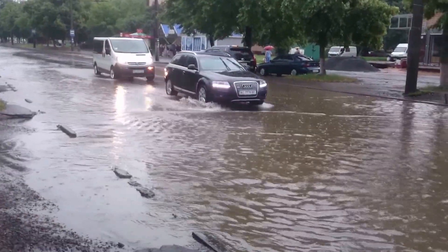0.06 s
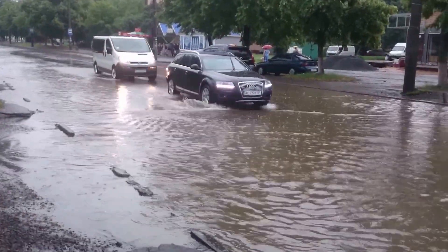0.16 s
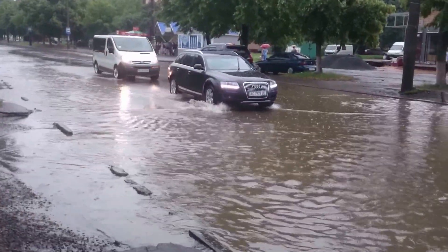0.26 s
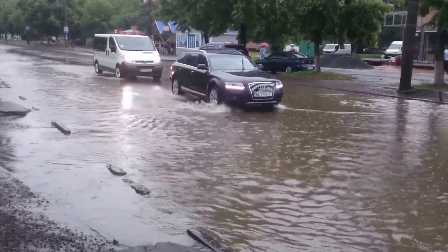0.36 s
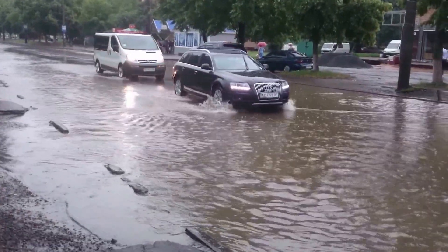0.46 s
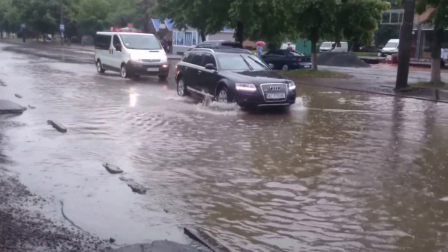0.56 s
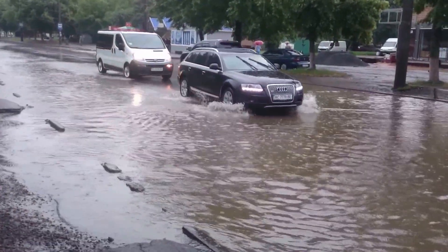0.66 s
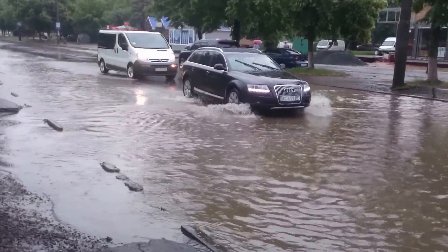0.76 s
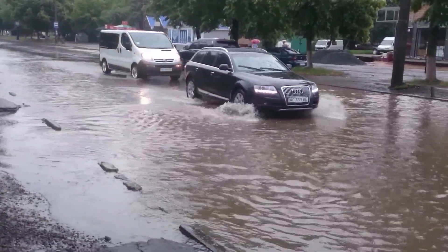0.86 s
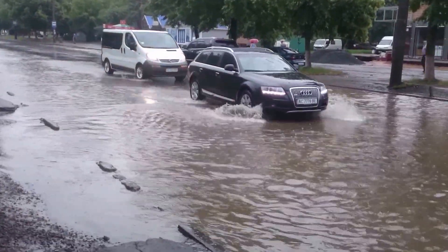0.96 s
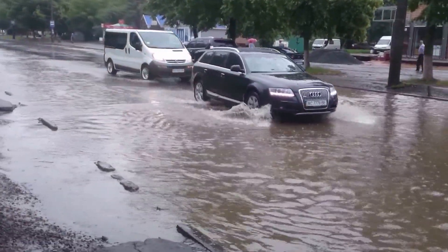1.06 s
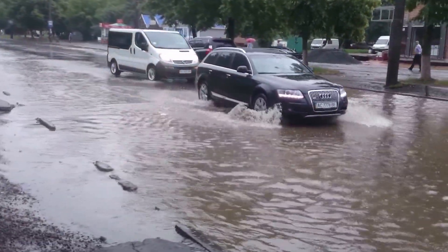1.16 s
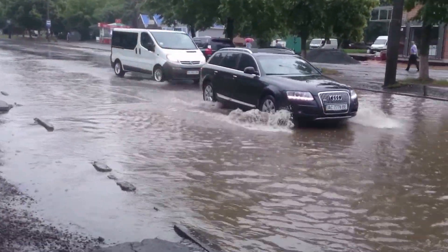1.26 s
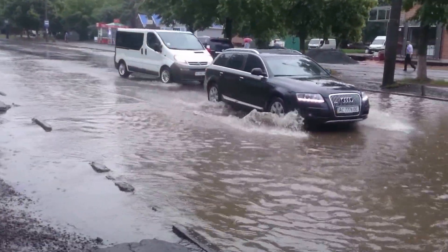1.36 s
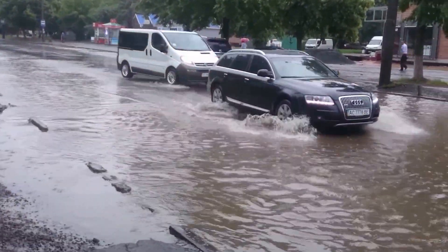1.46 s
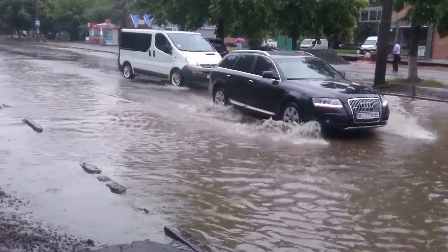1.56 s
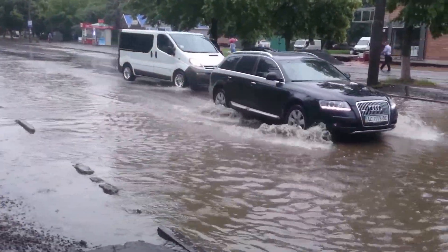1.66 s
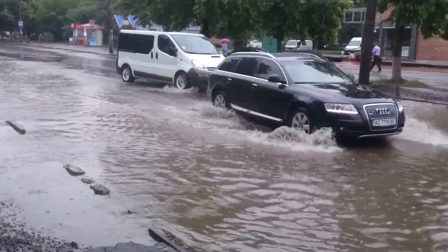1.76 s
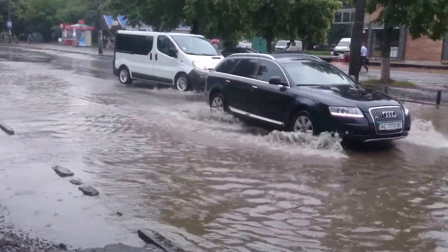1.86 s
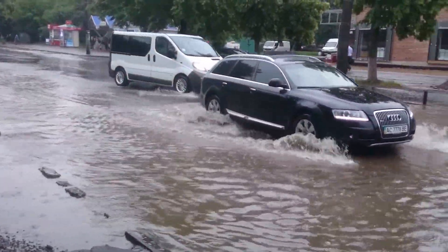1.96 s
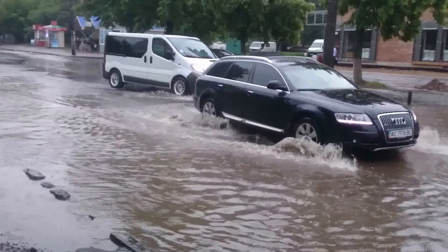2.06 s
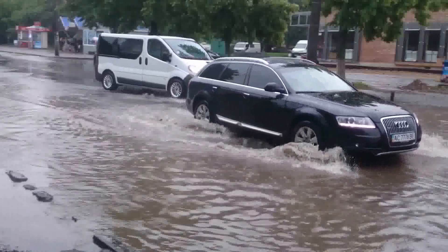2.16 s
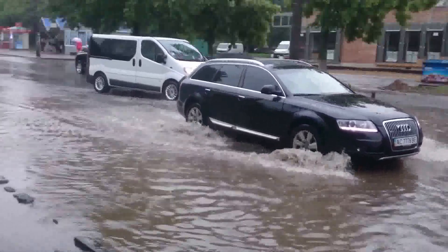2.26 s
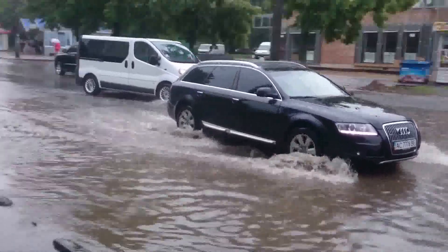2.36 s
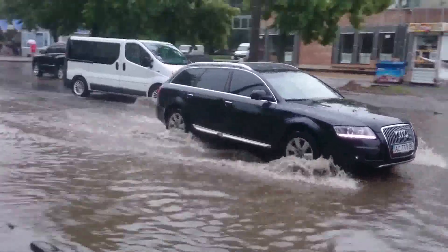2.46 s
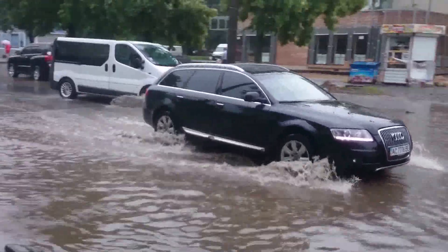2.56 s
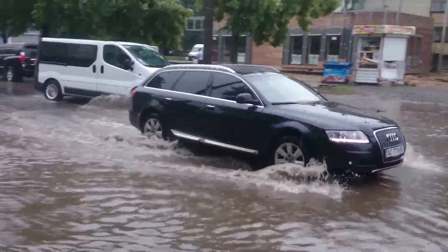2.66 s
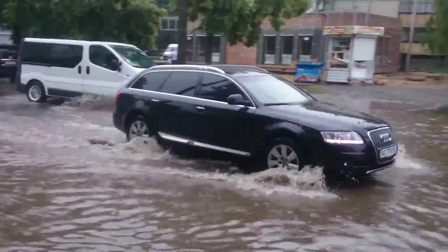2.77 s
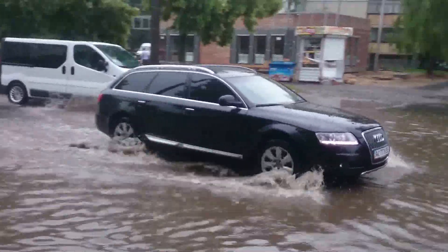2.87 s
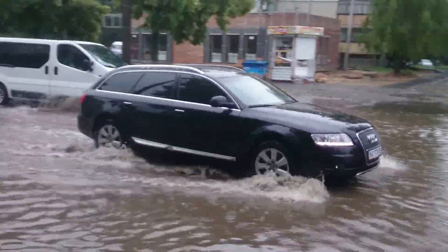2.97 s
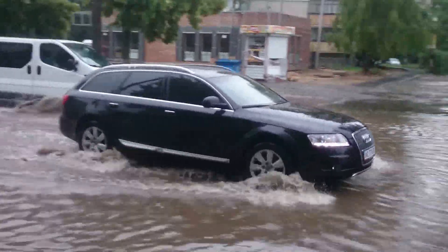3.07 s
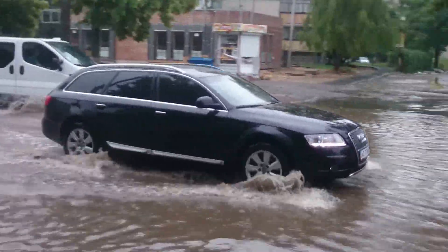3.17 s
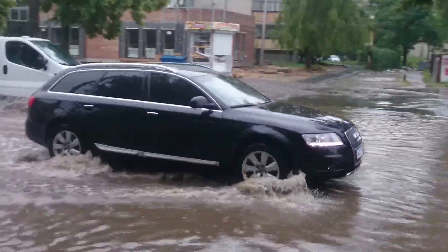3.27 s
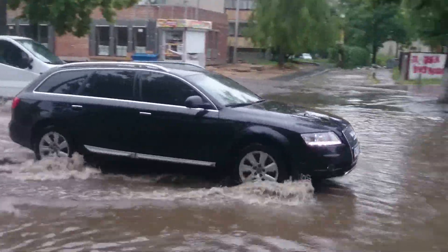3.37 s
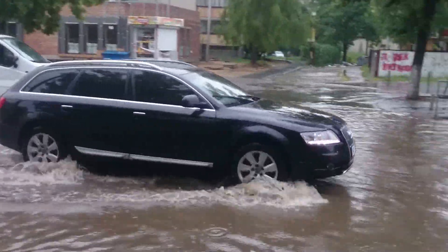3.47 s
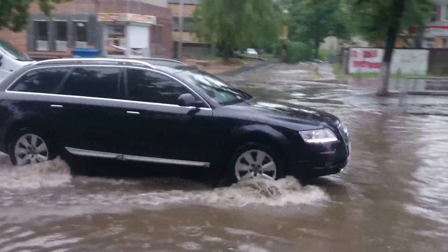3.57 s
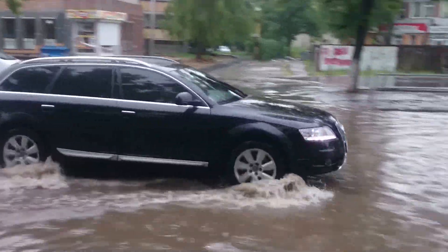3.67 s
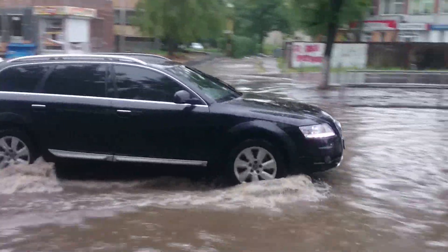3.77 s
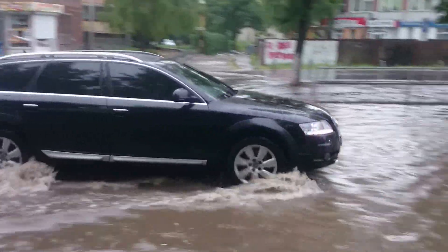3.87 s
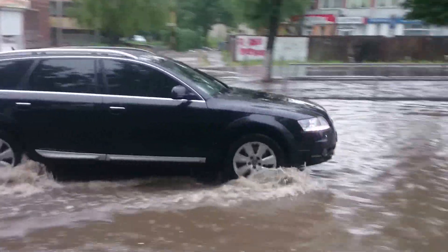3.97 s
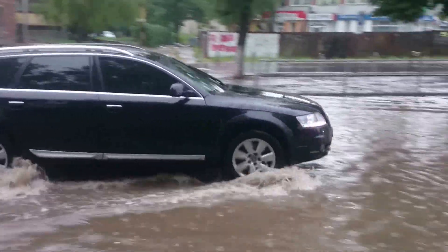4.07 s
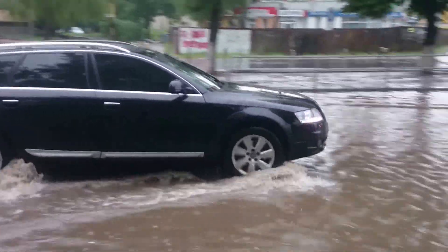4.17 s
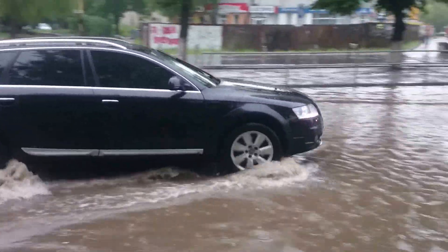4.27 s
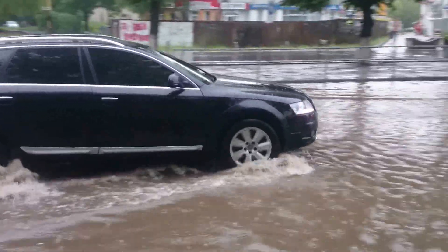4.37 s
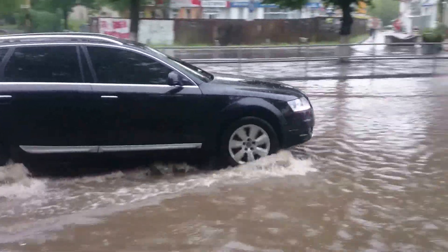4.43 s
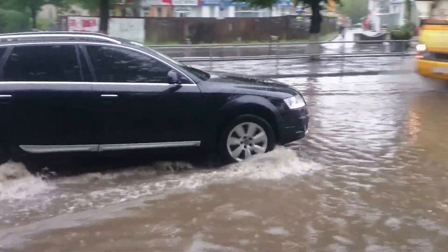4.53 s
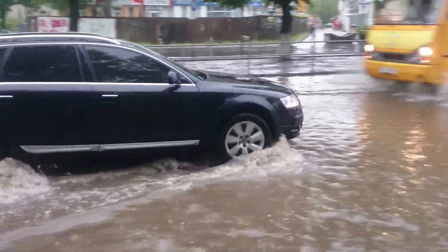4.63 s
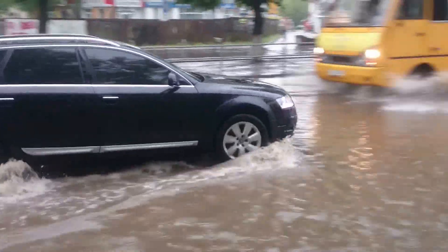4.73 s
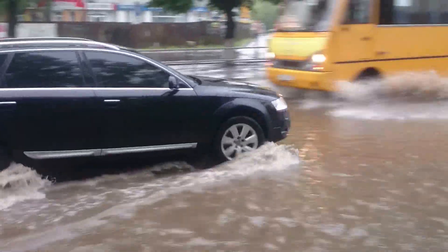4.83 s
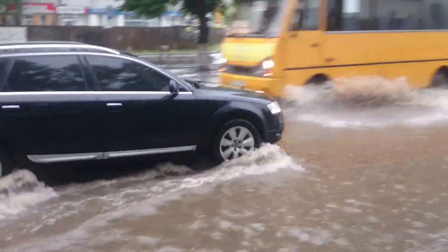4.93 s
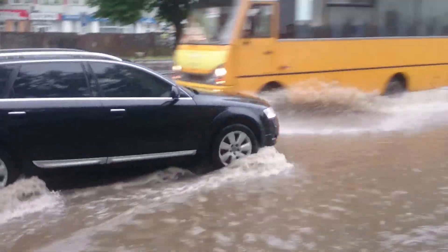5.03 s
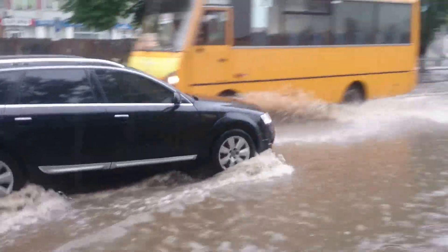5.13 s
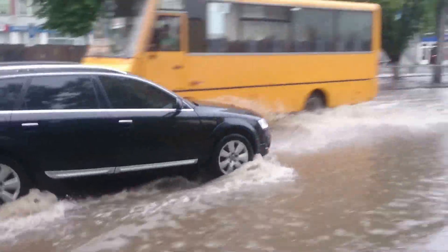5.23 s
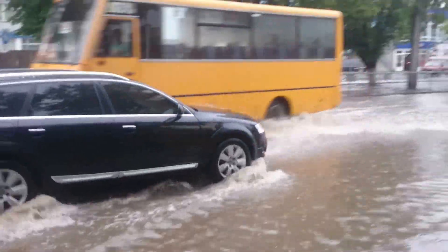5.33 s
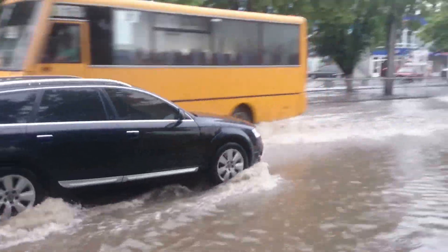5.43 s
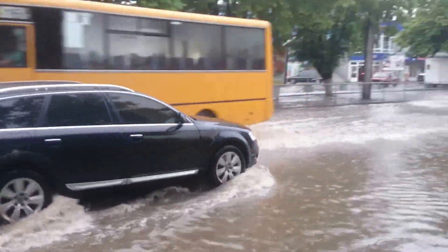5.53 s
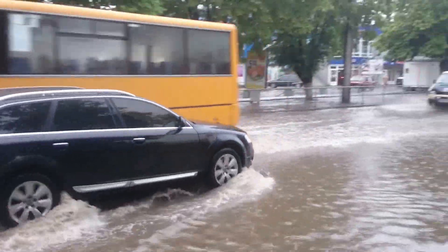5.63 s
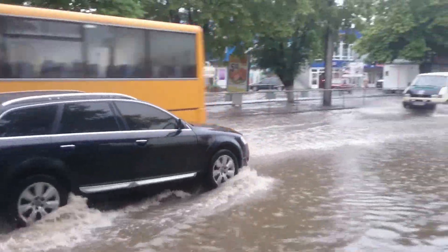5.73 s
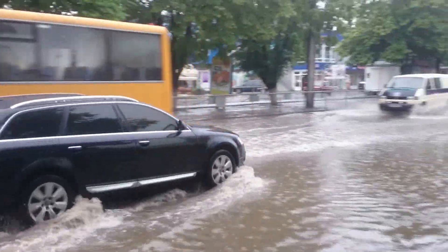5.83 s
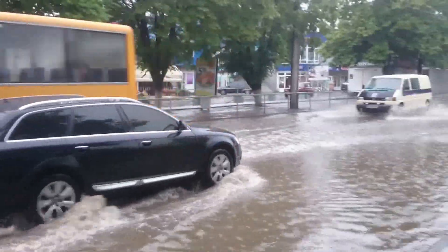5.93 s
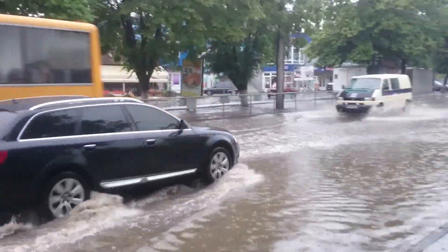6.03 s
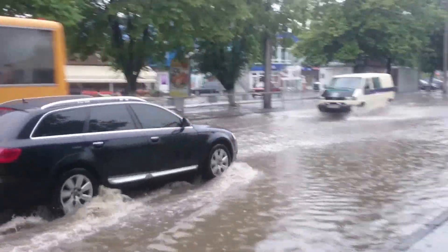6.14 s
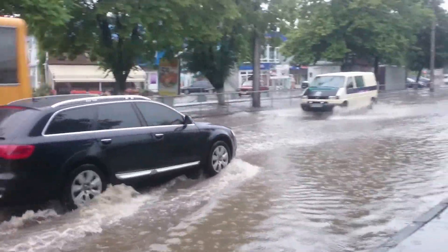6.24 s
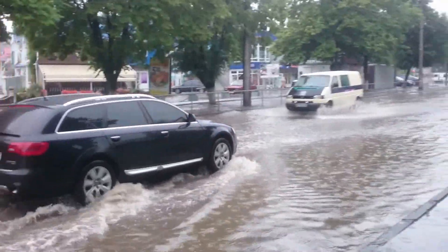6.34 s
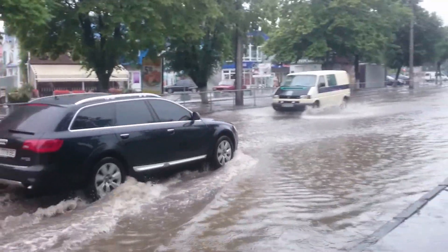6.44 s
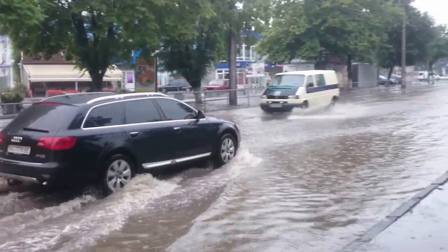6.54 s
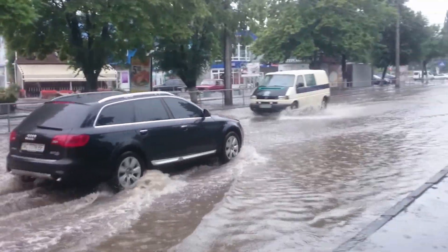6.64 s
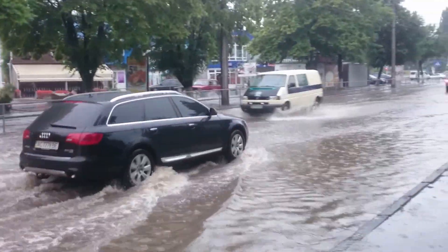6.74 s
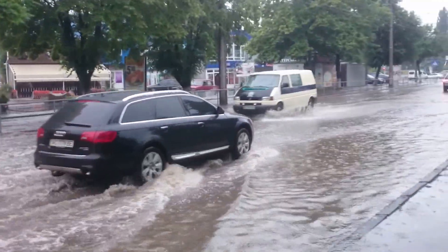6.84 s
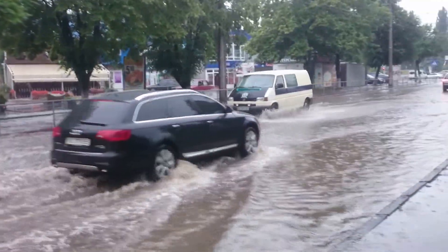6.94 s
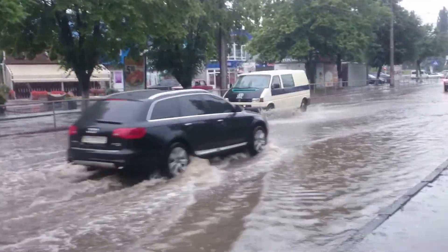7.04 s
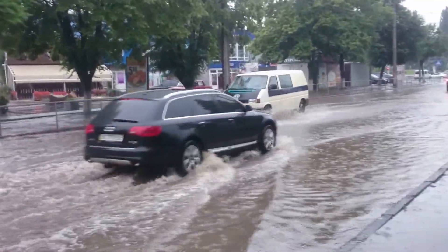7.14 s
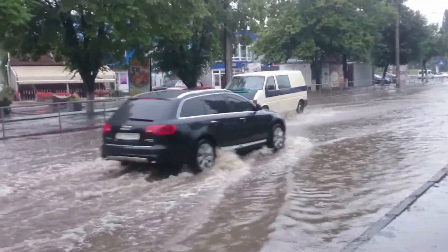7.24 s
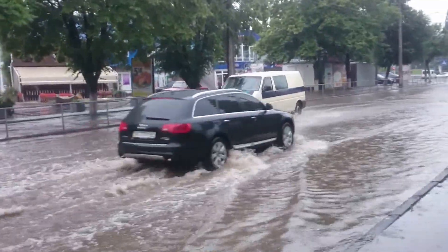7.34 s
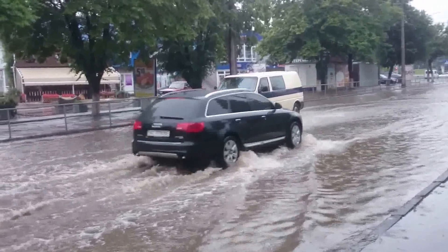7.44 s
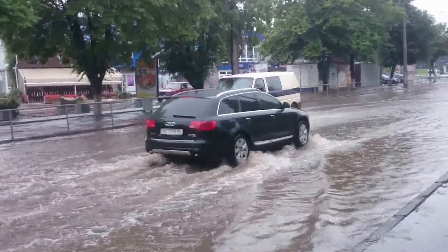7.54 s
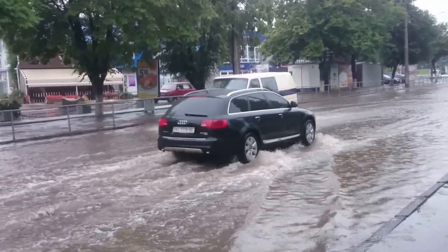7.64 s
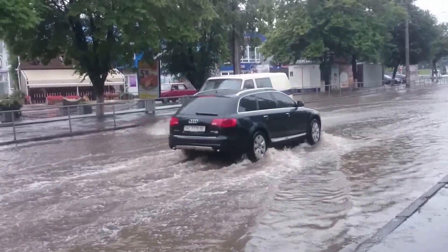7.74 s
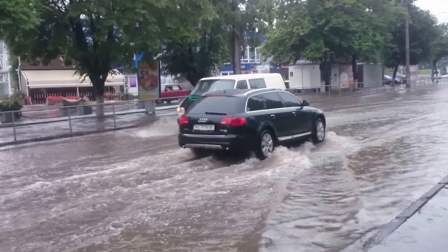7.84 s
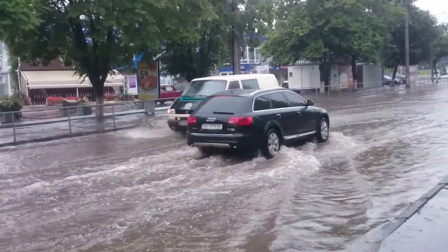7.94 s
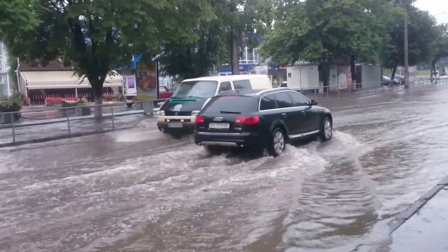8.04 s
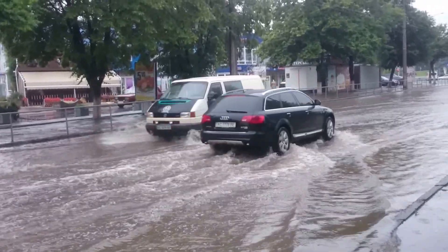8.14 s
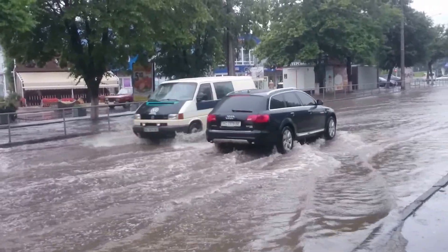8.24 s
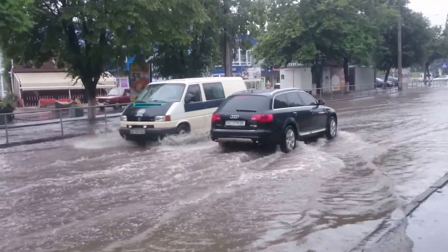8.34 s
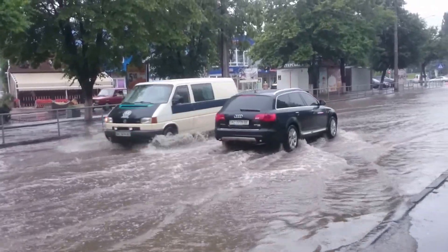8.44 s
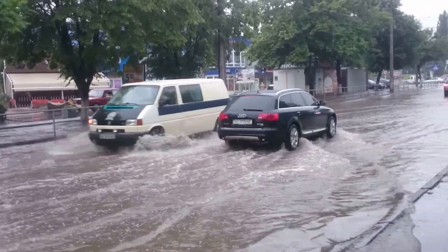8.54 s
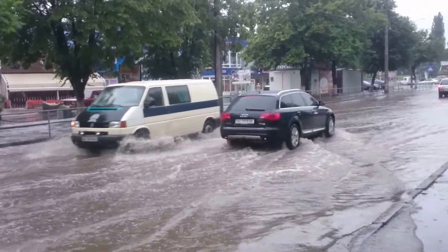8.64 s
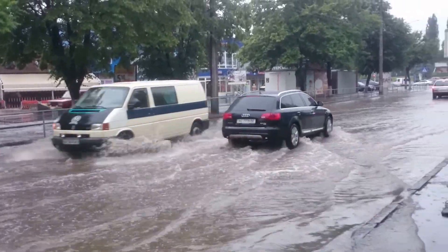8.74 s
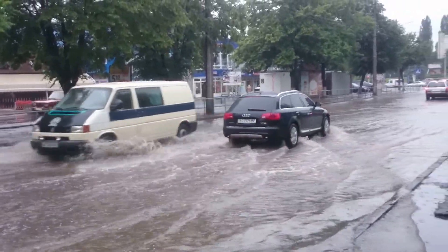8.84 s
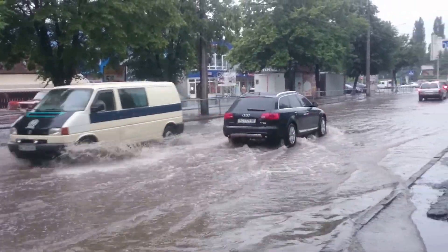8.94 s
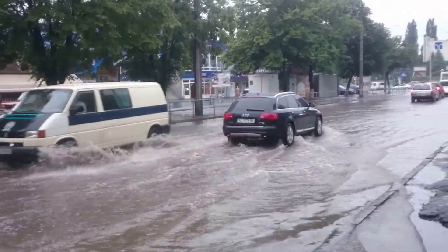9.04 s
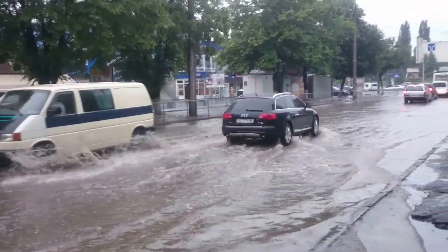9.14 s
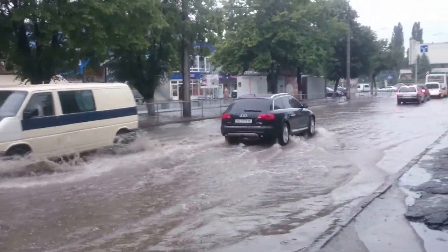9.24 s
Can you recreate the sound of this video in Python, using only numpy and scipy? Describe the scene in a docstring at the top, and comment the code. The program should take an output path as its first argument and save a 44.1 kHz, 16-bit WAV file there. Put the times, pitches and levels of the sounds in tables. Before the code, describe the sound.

A car wades slowly past through deep water, its wheels hissing and splashing over a low engine hum and rumble.

```python
"""A car wades slowly through a flooded street, passing close to a handheld phone.
Its wheels throw hissing spray over splashing, churning water; body and exhaust rumble, and the six-cylinder
engine hums with a faint whine. Farther off, bus and van traffic is a deep throb. Waves thump the bodywork,
the hand trembles, one raindrop hits the phone. The two microphones sit at opposite ends of the phone,
each behind a port with its own resonance."""
import sys
import numpy as np
from scipy import signal
from scipy.fft import rfft, irfft, next_fast_len
from scipy.io import wavfile
from scipy.ndimage import uniform_filter1d, map_coordinates

SR = 44100
rng = np.random.default_rng(int(sys.argv[2]) if len(sys.argv) > 2 else 0)


def to_wav(s):
    """Save 16-bit WAV."""
    ch = np.atleast_2d(s).T  # columns
    pcm = np.round(np.clip(ch, -1, 1) * 32767)  # PCM
    wavfile.write(sys.argv[1], SR, pcm.astype(np.int16))


N = 410130
TIME = np.arange(N) / SR


def gain_of(db):
    """Decibels to gain."""
    return 10 ** (np.asarray(db) / 20)


def unit_rms(x):
    """Scales to rms 1."""
    return x / np.sqrt(np.mean(x ** 2) + 1e-20)


def spectrum_at(points, hz):
    """Reads a spectrum on a log-frequency axis."""
    f, value = np.transpose(points)
    return np.interp(np.log(hz + 1), np.log(f + 1), value)


def follow(rows, t=TIME):
    """Reads every column of a curve at the times t."""
    times, *columns = np.transpose(rows)
    return [np.interp(t, times, column) for column in columns]


def wander(top_hz):
    """Random drift of rms 1, no faster than top_hz."""
    rates = np.geomspace(top_hz / 20, top_hz, num=24)
    return unit_rms(sum(np.sin(2 * np.pi * (f * TIME + rng.random())) / np.sqrt(f) for f in rates))


def panned(db):
    """Splits a left-minus-right level between the microphones."""
    return gain_of(np.array([db, -db]) / 2)


def tones(hz, orders=((1, 0),), *, waver_db):
    """Sines at (multiple, level [dB]) of a frequency curve, each wavering in level."""
    turns = np.cumsum(hz) / SR
    return np.sqrt(2) * sum(
        gain_of(db + waver_db * wander(5.1)) * np.sin(2 * np.pi * (k * turns + rng.random()))
        for k, db in orders)


# Direction from the phone: (time [s], left lag of the low sounds [ms], left lag of spray and splash [ms],
# share arriving from that side [0-1], spray left minus right [dB])
BEARING = [(0, 0.05, 0.33, 0.4, -1.5), (1.3, 0.05, .33, 0.5, -0.5), (1.8, -0.015, 0.3, 0.5, 0),
           (2.4, -0.036, 0.32, .55, 0), (3.7, -0.13, 0.38, .3, -.5), (4.2, -.15, 0.34, 0.4, 1.7),
           (4.8, 0.08, 0.3, 0.4, 1), (5.3, -0.23, -0.017, 0.4, 0), (5.8, -0.32, -0.38, 0.57, -1),
           (6.5, -0.36, -0.45, 0.9, -2), (7.8, -.35, -0.43, .9, -6), (8.7, -0.31, -0.36, .4, -2),
           (9.3, -.22, -0.32, 0.81, -1)]
# Likeness of the two ports for sound from one side: (frequency [Hz], coherence [0-1])
DIRECT_COHERENCE = [(250, 0.98), (1000, 0.85), (1500, 0.64), (2300, 0.69), (3200, 0.27), (5000, 0.2),
                    (8000, 0.14)]
# The same for sound from all around, negative where they move in opposition: (frequency [Hz], coherence)
DIFFUSE_COHERENCE = [(60, .99), (250, 0.88), (600, .55), (1050, -0.044), (1200, -0.24), (1380, -0.81),
                     (1560, -0.15), (2000, -0.064), (2600, 0.12), (3500, 0.014)]
def port_coherence(hz, t, from_wheels):
    """The direct share reaches the left port late or early; the rest arrives from all around."""
    low_ms, spray_ms, share, _ = follow(BEARING, t)
    lag_s = (spray_ms if from_wheels else low_ms) / 1000
    direct = np.clip(spectrum_at(DIRECT_COHERENCE, hz) * share, 0, 1)
    diffuse = np.clip(spectrum_at(DIFFUSE_COHERENCE, hz), -1, 1)
    return direct * np.exp(-2j * np.pi * hz * lag_s) + (1 - direct) * diffuse


# Right port's ring, shifting with the angle of the sound:
# (time [s], height [dB], centre [Hz], half-width [Hz])
PORT_RING = [(0, 3, 5650, 220), (.95, 2, 5650, 220), (1.1, 5, 5700, 220), (2.2, 2.5, 5700, 250.1),
             (3, 5.5, 5750, 300), (4.5, 3, 5800, 350), (5.5, 5, 5930, 400), (6.8, 7, 6050, 450),
             (7.3, 5, 5850, 350.2), (7.8, 3.5, 5600, 300), (9.3, 3.5, 5500, 300)]
def wash(colour, size, patchy_db, flicker_db, from_wheels=False, pitch=0.89, tilt=0., ring=False):
    """Patchy, flickering noise at both ports; pitch scales the colour's frequencies, tilt is dB/octave."""
    hop = size // 4
    frames, hz = N // hop + 5, np.fft.rfftfreq(size, 1 / SR)[:, None]
    t = np.arange(frames) * hop / SR
    real, imag, own_real, own_imag, patches = rng.standard_normal((frames, len(hz), 5)).T
    patches = uniform_filter1d(patches, size=size // 64, axis=0)
    patches = unit_rms(uniform_filter1d(patches, size=4096 // hop, axis=1))
    flicker = unit_rms(uniform_filter1d(rng.standard_normal(frames), size=max(2048 // hop, 1)))
    coherence = port_coherence(hz, t, from_wheels)
    right = real + 1j * imag
    left = coherence * right + np.sqrt(np.maximum(1 - abs(coherence) ** 2, 0)) * (own_real + 1j * own_imag)
    pitch, tilt = (np.interp(t, TIME, v * np.ones(N)) for v in (pitch, tilt))
    db = spectrum_at(colour, hz / pitch) + tilt * np.log2(hz / 5500 + 0.015)
    treble_flicker_db = 0.05 * np.log2(np.maximum(hz / 5700, 1))  # grows above the port resonance
    db += patchy_db * patches + (flicker_db + treble_flicker_db) * flicker
    if ring:
        ring_db, ring_hz, width_hz = follow(PORT_RING, t)
        right = right * gain_of(ring_db / (1 + ((hz - ring_hz) / width_hz) ** 2))
    _, noise = signal.istft(np.array([left, right]) * gain_of(db), nperseg=size, noverlap=size - hop)
    return unit_rms(noise[:, :N])


# Spectrum of the traffic behind the car: (frequency before pitch scaling [Hz], level [dB])
THROB_COLOUR = [(1.5, -26), (4, -9), (11, -7), (17, -2), (25, -3), (33, -9), (50, -12), (100, -38)]
# Its swells: (time [s], level [dB])
THROB_LEVEL = [(0, -34.5), (.6, -32), (1.3, -28.5), (1.8, -33), (2.1, -28), (2.5, -33), (2.7, -32),
               (3.3, -29), (4, -30), (5, -27), (5.8, -28.5), (6.5, -25), (7.2, -26.5), (7.8, -27.5),
               (8.5, -31), (9.3, -27.5)]
def traffic_throb():
    """Traffic farther down the street arrives as deep noise, in lumps."""
    level_db = follow(THROB_LEVEL)[0] + 2.5 * wander(7.)
    return gain_of(level_db) * wash(THROB_COLOUR, 16384, patchy_db=0.69, flicker_db=0.99)


# Shake of the hand holding the phone: (time [s], level [dB])
TREMOR_LEVEL = [(0, -35), (1, -33), (1.35, -26), (1.7, -30), (2.8, -30), (3.2, -22), (3.9, -29), (4.6, -28),
                (5, -22), (5.55, -30), (5.85, -24), (6.3, -29), (6.8, -22), (7.6, -28), (7.95, -22),
                (8.8, -28), (9.3, -23)]
def hand_tremor():
    """The trembling hand pumps both microphones far below hearing."""
    hz = 8.7 + .35 * wander(2.)
    return gain_of(follow(TREMOR_LEVEL)[0]) * tones(hz, waver_db=1.)


# One drop on the phone itself: (time [s], tick level [dB], push level [dB])
RAINDROP = (2.42, -25, -16)
def raindrop():
    """A drop lands at the right port: a bright tick and a low push, much weaker on the left."""
    hit_s, tick_db, push_db = RAINDROP
    gap_s = abs(TIME - hit_s)
    crack = rng.standard_normal(N) * np.exp(-gap_s / .0004)
    tick = 3 * crack + .7 * np.diff(crack, 2, prepend=[0, 0])  # the hard shell adds treble
    push = -np.exp(-gap_s / 0.0025)
    return (gain_of(tick_db) * tick + gain_of(push_db) * push) * gain_of([[-14], [.1]])


# Waves striking the car: (time [s], level [dB], pitch [Hz])
THUMPS = [(0.101, -26, 89.6), (0.587, -21, 81), (1.41, -25, 40), (1.955, -22, 38), (2.59, -28, 40),
          (8.034, -30, 152.7), (8.201, -18, 164)]
def wave_thumps():
    """Each wave gives the bodywork a short, damped low ring."""
    out = np.zeros(N)
    for hit_s, db, hz in THUMPS:
        age = np.maximum(TIME - hit_s, 0)
        out -= gain_of(db) * np.sin(2 * np.pi * hz * age) * np.exp(-age / 0.018)
    return out


# Spectrum of body and exhaust: (frequency before pitch scaling [Hz], level [dB])
RUMBLE_COLOUR = [(10, -4), (30, 9), (60, -0.5), (110, 2.5), (200, 1), (300, -1.5), (420, -8.5), (800, -27)]
# Their course past the phone: (time [s], level [dB], pitch [factor])
RUMBLE = [(0, -42, 0.77), (.45, -42, 1.06), (1.1, -38, 1), (1.7, -39, 0.93), (2.7, -37.5, 1.07),
          (2.9, -35.5, 1.37), (3.3, -32.5, 1.4), (3.7, -32, 1.29), (4.2, -32, 1.034), (4.9, -29, 0.72),
          (5.3, -32, 0.82), (5.7, -32.5, 0.8), (6.3, -26.5, 0.98), (7.4, -28.5, 1.26), (8.3, -31, 1.18),
          (8.45, -32, 0.97), (8.8, -34, 1.11), (9.3, -29.5, 0.72)]
def body_rumble():
    """Body and exhaust give a low noise that shifts in pitch as the car goes by."""
    level_db, pitch = follow(RUMBLE)
    return gain_of(level_db) * wash(RUMBLE_COLOUR, 4096, patchy_db=0.68, flicker_db=0.3, pitch=pitch)


# Whine on the approach: (time [s], pitch [Hz], level [dB])
WHINE = [(0, 404, -54), (1.5, 404, -52), (1.9, 404, -57), (2.6, 404.5, -55), (2.7, 420, -62),
         (2.8, 449, -49), (3.2, 450, -47.5), (3.35, 451, -44), (3.62, 452, -41.5), (3.8, 450, -65),
         (4.1, 456, -90)]
def whine():
    """A faint, slightly rough tone while the car draws near."""
    hz, level_db = follow(WHINE)
    return gain_of(level_db) * tones(hz + 2.5 * wander(40.), waver_db=1.5)


# Cylinders firing: (time [s], firing rate [Hz], firing tone [dB], its octave [dB])
FIRING = [(0, 80.2, -50.5, -47), (.6, 79.33, -36.5, -47.5), (1.4, 79, -48, -45), (1.9, 75.2, -43.5, -48),
          (2.7, 72.1, -44, -50), (2.95, 72.2, -41, -37), (3.07, 71.8, -39, -44), (3.17, 71.8, -37, -38),
          (3.27, 71.5, -38, -46), (3.37, 71.6, -38, -35), (3.55, 71.5, -33.5, -44), (3.8, 72.5, -40, -34.5),
          (4.2, 73.84, -34.5, -33.5), (4.75, 75.46, -35, -55), (4.98, 75.8, -35, -42),
          (5.07, 75.5, -31.5, -29.5), (5.35, 76, -30, -34), (5.6, 76.5, -30, -28),
          (5.85, 76.74, -27, -34.5), (6.05, 77.2, -34, -28), (6.25, 77.64, -34, -37.5),
          (6.38, 77.6, -33, -30), (6.6, 77.8, -36, -35), (6.9, 78.05, -34, -34.5), (7.3, 77.75, -32, -27.5),
          (7.8, 78.24, -39.5, -34.5), (8.25, 77.34, -34, -34), (8.7, 78, -35, -42.5),
          (9.3, 77.6, -37.5, -40)]
# Higher harmonics of the firing: (time [s], third [dB], fourth [dB])
FIRING_HARMONICS = [(0, -62, -58), (2.8, -56, -56), (3.5, -44, -46), (4.1, -36, -44), (4.5, -51, -42),
                    (4.7, -48, -39), (5, -46, -47), (5.9, -46, -50), (6.1, -36.5, -46), (6.9, -34.5, -42.5),
                    (7.3, -36, -42), (7.9, -42, -39.5), (8.3, -46, -41), (9.3, -48, -53)]
# Crankshaft orders: (multiple of shaft speed, relative level [dB])
SHAFT_ORDERS = [(2, -5), (4, -10), (5, -0.5), (7, -0.5), (8, -2.5), (10, -9), (11, -8.5)]
# Orders of the whole four-stroke cycle: (multiple of half the shaft speed, relative level [dB])
CYCLE_ORDERS = [(7, -11), (11, -16.5), (13, -3), (17, -7), (19, -6.5), (21, -13.5), (23, -6.5), (26, -10),
                (28, -17)]
# Both sets together: (time [s], level [dB])
SHAFT_LEVEL = [(0, -53), (2.7, -58.5), (3.4, -46), (4.3, -39), (5, -41.5), (5.6, -45.5), (6.1, -40.5),
               (6.8, -38.5), (7.5, -39), (8.3, -40), (8.5, -47), (9.3, -48)]
# Half orders of the uneven cylinder banks: (multiple of half the firing rate, relative level [dB])
BANK_ORDERS = [(1, 0.5), (3, -6)]
# They peak as the tailpipes turn toward the phone: (time [s], level [dB])
BANK_LEVEL = [(0, -52), (1.5, -48), (4.5, -46), (5.1, -39), (6, -42), (6.5, -36), (7.05, -30), (7.5, -38),
              (8.2, -42), (8.7, -37), (9.3, -37)]
def engine():
    """A six-cylinder four-stroke fires three times a turn; tones and whine reach the ports a lag apart."""
    hz, firing_db, octave_db = follow(FIRING)
    third_db, fourth_db = follow(FIRING_HARMONICS)
    hz = hz * (1 + .0025 * wander(12.))  # the load of the water shakes the speed
    shaft_hz = hz / 3
    out = gain_of(firing_db) * tones(hz, waver_db=.9)
    out += gain_of(octave_db) * tones(2 * hz, waver_db=.8)
    shaft = tones(shaft_hz, SHAFT_ORDERS, waver_db=2.4)
    cycle = tones(shaft_hz / 2, CYCLE_ORDERS, waver_db=3.8)
    out += gain_of(follow(SHAFT_LEVEL)[0]) * (shaft + cycle)
    out += gain_of(third_db) * tones(3 * hz, waver_db=2.)
    out += gain_of(fourth_db) * tones(4 * hz, waver_db=2.)
    out += gain_of(follow(BANK_LEVEL)[0]) * tones(hz / 2, BANK_ORDERS, waver_db=0.94)
    out += whine()
    lag_s = follow(BEARING)[0] / 1000
    return np.array([np.interp(TIME - lag_s, TIME, out), out])


# Path off the water between car and phone: (time [s], extra delay [ms], strength [0-1])
REFLECTION = [(0, 1.19, 0.07), (4.3, 0.91, 0.07), (5.6, 1.28, 0.12), (9.3, 1.285, 0.06)]
def with_flood_reflection(direct):
    """The flood mirrors the sound a moment later, which combs the spectrum."""
    delay_ms, strength = follow(REFLECTION)
    positions = np.arange(N) - delay_ms * SR / 1000
    reflected = np.array([map_coordinates(side, [positions], order=3) for side in direct])
    return direct + strength * reflected


def bubbles(per_s, spread_db, low_hz, high_hz):
    """Air pockets ring for a few cycles with rising pitch, each heard at one port."""
    strengths = gain_of(spread_db * np.minimum(rng.exponential(1, N), 5))
    births = strengths * (rng.random(N) < per_s / SR)
    size_class, out = rng.integers(0, 24, N), np.zeros((2, N))
    for k, hz in enumerate(np.geomspace(low_hz, high_hz, num=24)):
        cycles = np.arange(2000) / SR * hz
        envelope = np.exp(-cycles / 5) * (1 - np.exp(-cycles / 0.26))
        ring = envelope * np.sin(2 * np.pi * cycles * (1 + 0.0102 * cycles))
        out[k % 2] += signal.oaconvolve(births * (size_class == k), ring)[:N]
    return unit_rms(out)


# Water pushed aside: (time [s], churning [dB], splashing [dB])
WAKE = [(0, -43.5, -42.5), (.85, -41.5, -37.5), (1.25, -39, -35), (2.1, -38, -35), (2.9, -35.5, -34),
        (3.9, -34.5, -34.5), (4.5, -31, -34), (5, -31.5, -30.5), (5.2, -32, -34), (5.5, -35, -36),
        (5.85, -32, -35), (6.15, -32.5, -33.5), (6.7, -32.5, -30.5), (7.2, -36.5, -35.5), (7.7, -36, -37.5),
        (8.2, -38.5, -43), (8.9, -35, -39.5), (9.3, -38, -38)]
# Spectra of splashing and churning: (frequency before pitch scaling [Hz], level [dB])
SPLASH_COLOUR = [(700, -16.5), (1000, -4), (1300, -0.5), (1600, -3), (2000, -0.5), (2800, -2.5),
                 (4500, -18.5)]
CHURN_COLOUR = [(250, -5), (450, -4.5), (700, 1), (900, -3), (1100, -4), (1350, -9.5), (2200, -21.5)]
def wake():
    """Water shoved aside by the wheels churns, splashes and traps bubbles."""
    churn_db, splash_db = follow(WAKE)
    pitch = 1.082 - 0.0075 * TIME  # sinks as the car draws away
    bubbling = gain_of(-10 + wander(8.)) * bubbles(per_s=700, spread_db=2.8, low_hz=507, high_hz=3580)
    splash = wash(SPLASH_COLOUR, 512, patchy_db=0.8, flicker_db=0.96, from_wheels=True, pitch=pitch)
    churn = wash(CHURN_COLOUR, 1024, patchy_db=0.31, flicker_db=0.66, pitch=pitch)
    pan_db = -0.5 + 0.84 * follow(BEARING)[3]  # leans to the side of the spray
    return panned(pan_db) * (gain_of(splash_db) * (splash + bubbling) + gain_of(churn_db) * churn)


# Water thrown up close to the phone: (time [s], level [dB], brightness [dB/octave])
SPRAY = [(0, -36.5, -1.5), (.88, -33, 0.5), (1.02, -31, 0.5), (1.5, -27.5, 1.2), (2.3, -27, 1),
         (2.9, -27, 0.6), (3.5, -25.5, 2.5), (3.7, -25, 3.5), (4.33, -24, 0.5), (4.42, -22, -0.5),
         (4.75, -23, 1), (5.05, -23.5, 2), (5.2, -25.5, 1), (5.6, -30, 0), (5.84, -29, 0), (5.9, -27, 1),
         (6.02, -28.5, 3.5), (6.19, -29, 1.5), (6.25, -25.5, 1.5), (6.4, -28, 3), (6.55, -25, 3.5),
         (6.68, -27, 4), (6.85, -23, 2), (6.92, -27, 2), (7.1, -29.5, 0.5), (7.45, -29.5, -1.5),
         (7.8, -30, -2.5), (8.12, -31.5, -3.5), (8.22, -29.5, -5), (8.4, -32.5, -3.5), (8.7, -32.5, -1),
         (9.05, -32, -1.5), (9.3, -32.5, 0)]
# Spectrum of its hiss: (frequency before pitch scaling [Hz], level [dB])
SPRAY_COLOUR = [(1500, -12.5), (3000, -2.5), (4000, 0.5), (8000, 1.5), (16000, -1.5)]
def wheel_spray():
    """The wheels fling up hissing spray, whose droplets fall back in clumps."""
    level_db, tilt = follow(SPRAY)
    hiss = wash(SPRAY_COLOUR, 512, patchy_db=0.88, flicker_db=0.52, from_wheels=True, tilt=tilt, ring=True)
    clumps = gain_of(-13 + 2.5 * wander(45.))
    droplets = clumps * bubbles(per_s=2500, spread_db=2.4, low_hz=1800, high_hz=13000)
    return (hiss + droplets) * gain_of(level_db) * panned(follow(BEARING)[3])


def scene():
    """The street at the phone's position; rumble and water also bounce off the flood."""
    rumble = body_rumble()
    background = traffic_throb() + hand_tremor()
    wading = with_flood_reflection(rumble + wheel_spray() + wake())
    return background + wading + engine() + wave_thumps() + raindrop()


# Responses of the two microphones behind their ports: (frequency [Hz], level [dB])
LEFT_MIC = [(10, -21), (20, -20), (40, -1), (150, -4), (500, -0.5), (900, -2), (1200, 0.5), (1380, -0.5),
            (1550, 1), (1900, -1), (3000, -1.5), (5500, 2.5), (6100, 4), (7000, -3), (8000, -5), (9500, -3),
            (12000, -7), (13000, -10), (13600, -14), (14300, -8.5), (15000, -9), (15700, -12)]
RIGHT_MIC = [(150, 0.5), (500, 1.5), (1000, -2.5), (1250, -0.5), (1400, -1), (1580, 1), (1900, 1.5),
             (3000, -4), (4200, 4), (5000, 7), (5700, 6.5), (6500, -1), (8000, -8.5), (10000, -13.5),
             (12500, -14.5), (13500, -13), (14500, -11), (15700, -15)]
LEFT_BASS_CUT_HZ, BAND_LIMIT_HZ = 40, 15850
def record(dry):
    """Each microphone colours its side, the left one loses its deep bass, and the phone cuts the top."""
    size = next_fast_len(N + SR)
    hz = np.fft.rfftfreq(size, 1 / SR)
    response = gain_of([spectrum_at(LEFT_MIC, hz), spectrum_at(RIGHT_MIC, hz)]) + 0j
    s = 1j * hz / LEFT_BASS_CUT_HZ
    response[0] *= s / (1 + s)  # high-pass, which also advances the bass
    coloured = irfft(rfft(dry, size) * response, size)[:, :N]
    lowpass = signal.firwin(1535, BAND_LIMIT_HZ, window=("kaiser", 9), fs=SR)
    return signal.oaconvolve(coloured, lowpass[None], "same")


dry = scene()
out = record(dry)
to_wav(out)
```